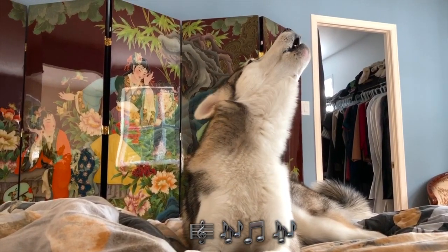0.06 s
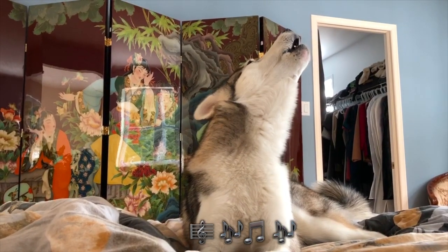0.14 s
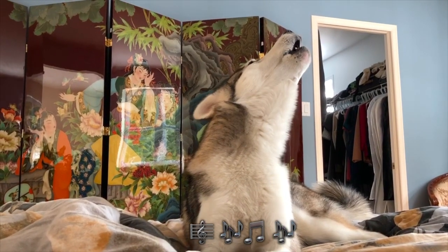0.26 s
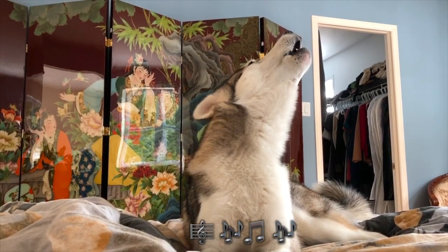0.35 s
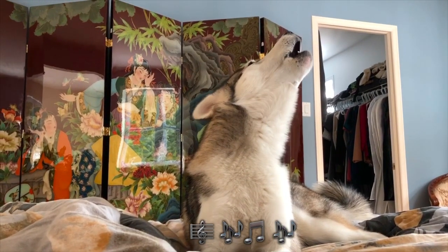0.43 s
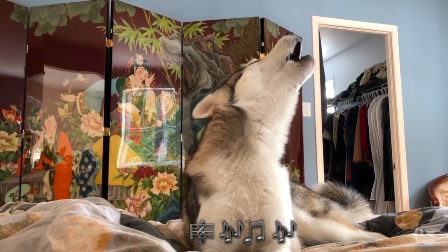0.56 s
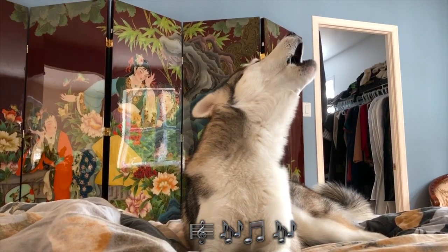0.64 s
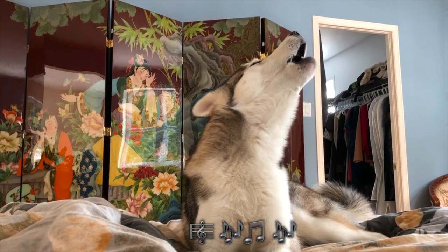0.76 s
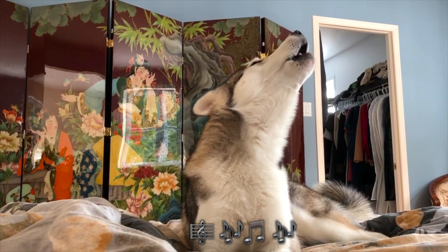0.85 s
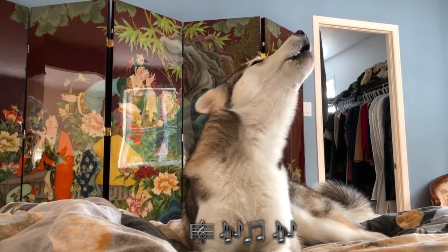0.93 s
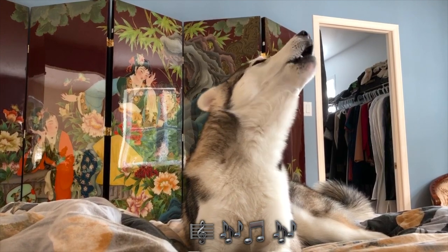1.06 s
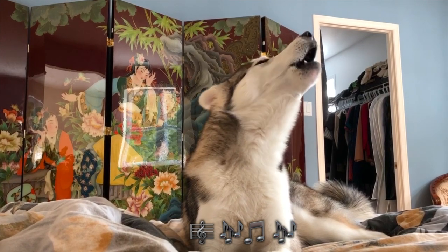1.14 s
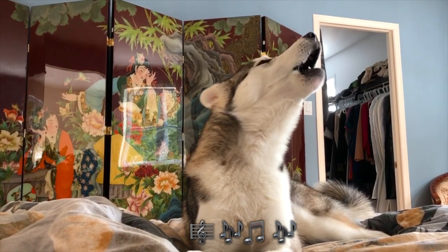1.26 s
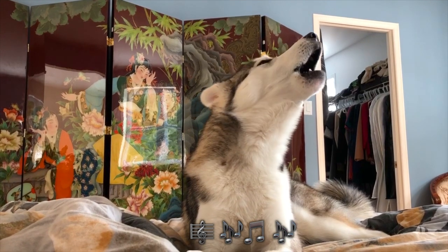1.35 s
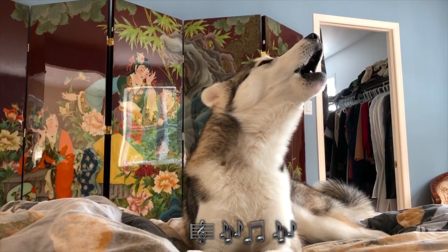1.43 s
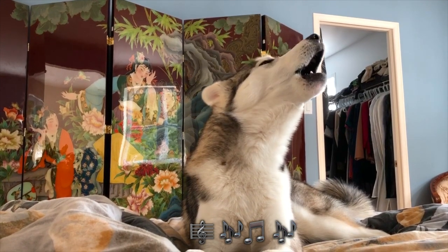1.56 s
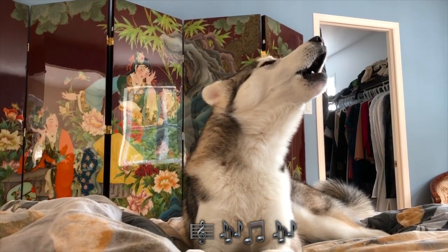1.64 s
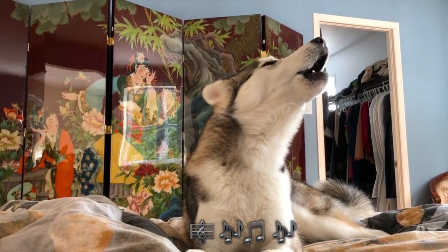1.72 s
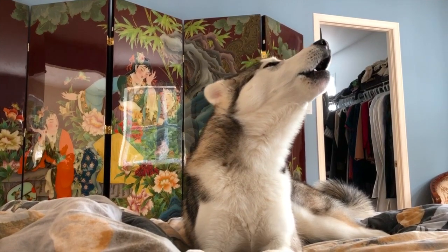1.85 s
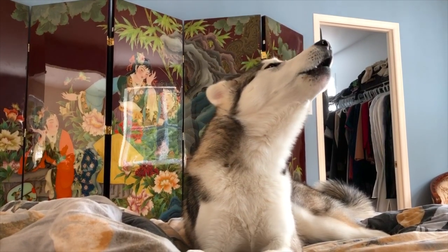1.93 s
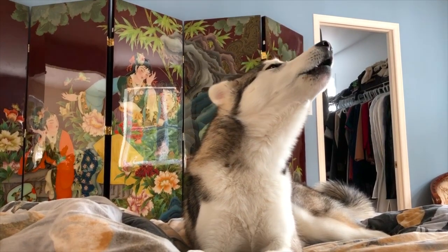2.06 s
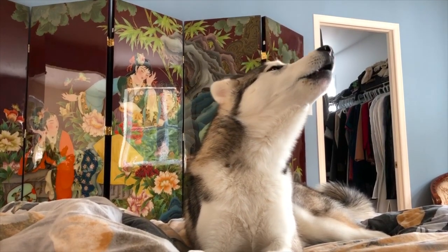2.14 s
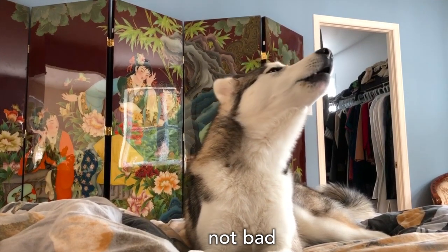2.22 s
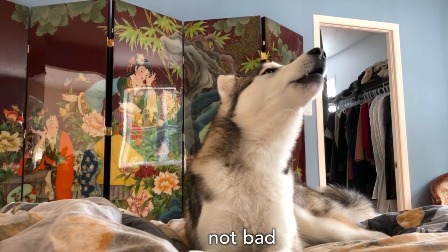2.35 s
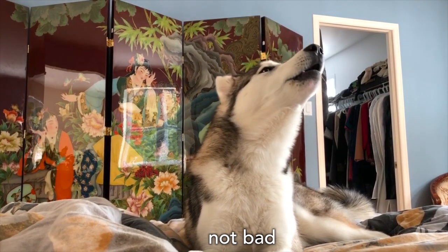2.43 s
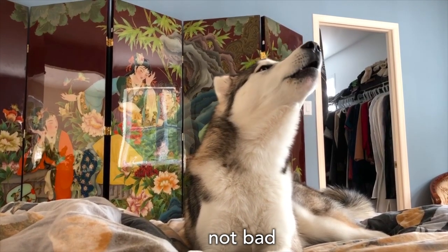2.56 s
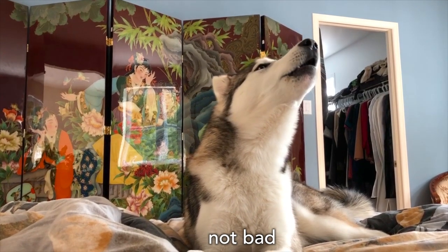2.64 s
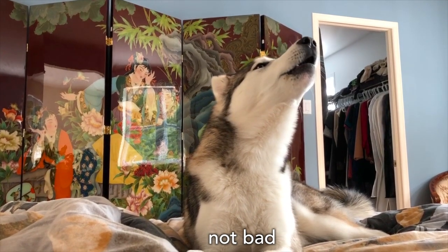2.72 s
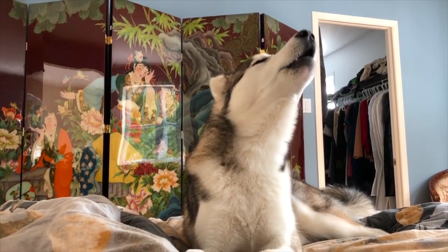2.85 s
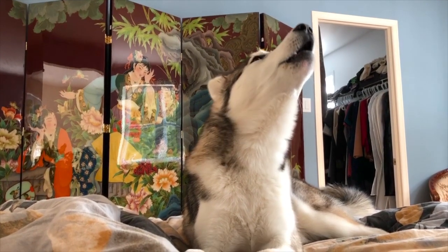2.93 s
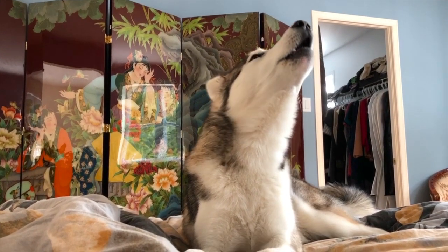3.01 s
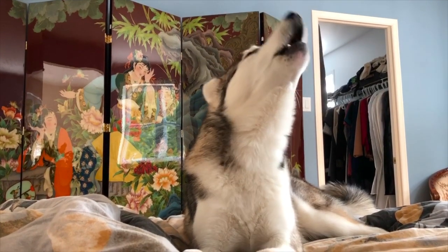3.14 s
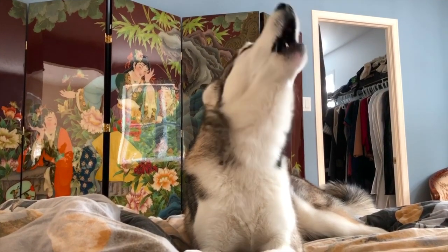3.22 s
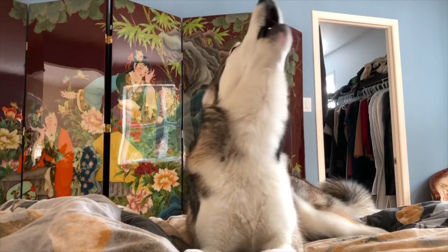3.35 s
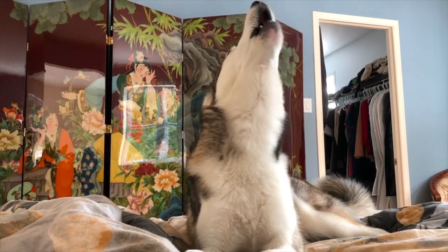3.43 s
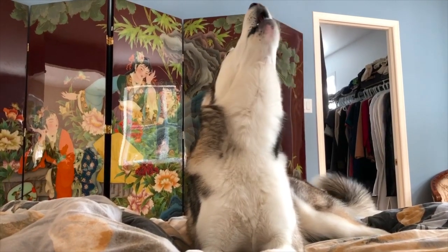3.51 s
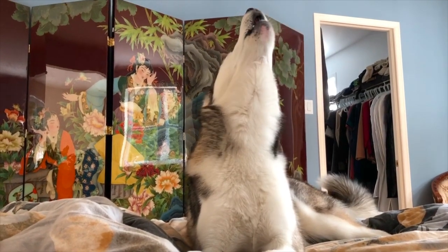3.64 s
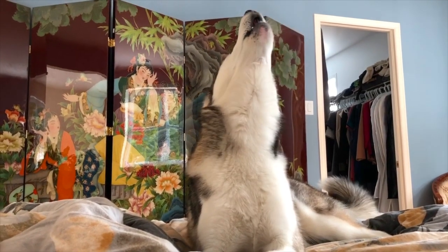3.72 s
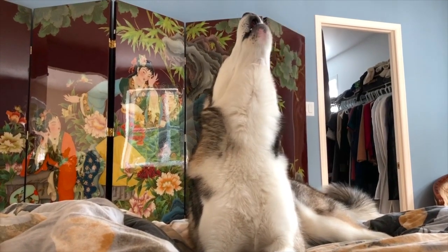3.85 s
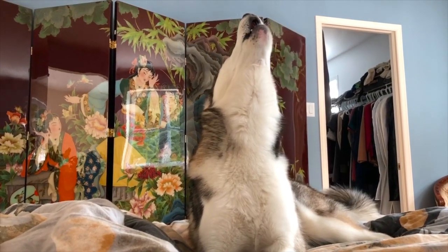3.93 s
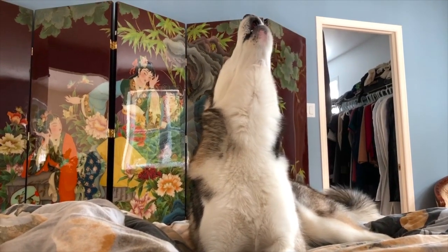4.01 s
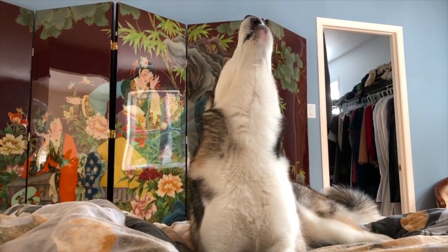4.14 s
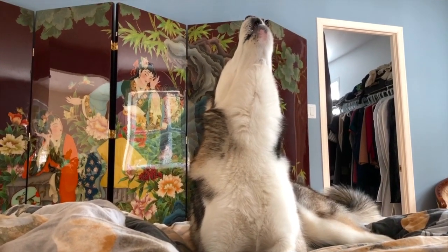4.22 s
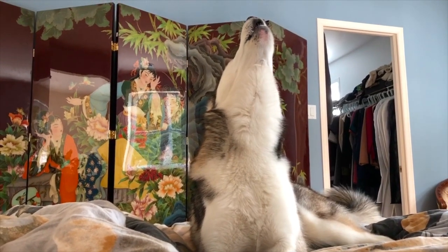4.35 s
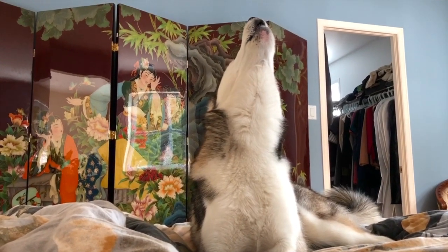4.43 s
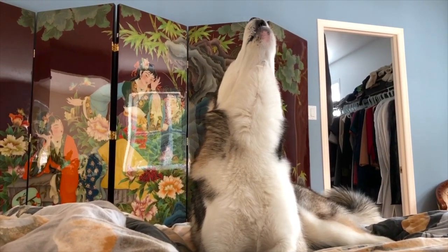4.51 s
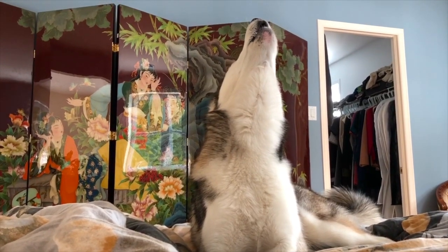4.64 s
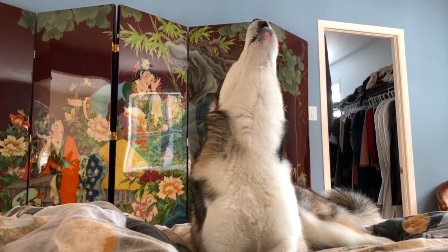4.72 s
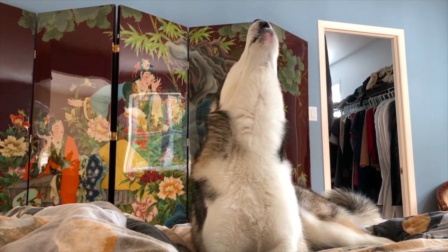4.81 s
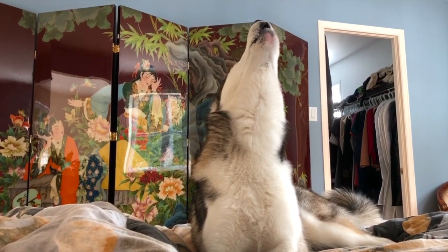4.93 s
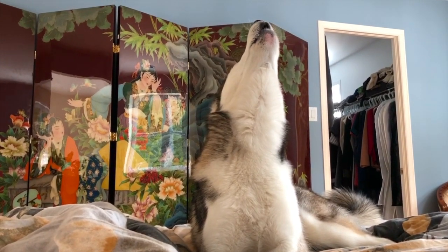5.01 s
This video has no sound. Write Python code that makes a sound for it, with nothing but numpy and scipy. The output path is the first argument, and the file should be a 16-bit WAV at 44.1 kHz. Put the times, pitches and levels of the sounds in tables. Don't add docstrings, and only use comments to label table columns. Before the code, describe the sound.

A husky close to a phone microphone in a small soft bedroom is already howling at the start: a nearly pure, hollow mid-pitched tone around 470 Hz with faint nasal ring and breath. It rises to about 520 Hz near 0.8 s, drops by 1.0, rises again by 1.4, then sinks and dies around 2.0. From 2.0 to 3.2 two distant dogs are exposed, one lower and stronger, one higher and fainter, their thin tones falling and fluttering. Low room rumble swells under faint hiss, with tiny collar or cloth ticks and soft mattress bumps around 2.1-2.9. At 3.2 a firmer thump meets a sudden open-mouthed yelp sweeping upward, rough and breathy. At 3.36 it cracks to about 700 Hz, eases down, then tips back near 4.25 to around 500 Hz. It keeps sinking, still sounding at 5 s, with distant howls rising behind from about 4.4. Short room echo throughout.

```python
import sys
import numpy as np
from scipy import signal
from scipy.fft import rfft, irfft, next_fast_len
from scipy.io import wavfile
from scipy.ndimage import uniform_filter1d, map_coordinates

SR = 44100
rng = np.random.default_rng(int(sys.argv[2]) if len(sys.argv) > 2 else 0)


def waveform_to_disk(signal):
    frames = np.transpose(np.atleast_2d(signal))
    scaled = np.clip(frames, -1, 1) * 32767
    samples = np.round(scaled).astype(np.int16)
    wavfile.write(sys.argv[1], SR, samples)


def to_linear_factor(level_db):
    exponent = np.asarray(level_db, float) / 20
    return 10 ** exponent


N = 223807
TIME = np.arange(N) / SR

# columns freq_hz, level_db
NOSE = [(3900, -51), (4500, -18), (5000, -12), (5400, 6), (5900, -15.5), (6500, 2.5), (7400, -13),
        (8200, -27), (9300, -33.5), (10400, -47.5), (11800, -39.5), (13000, -50.5), (14200, -46),
        (15800, -59)]
# columns freq_hz, level_db
WIDE = [(700, 4.5), (1300, -3.5), (1800, -19.5), (2200, -29.5), (2600, -36), (3100, -17), (3500, -28),
        (3900, -38), (9000, -120)]


def unit(x):
    return x / np.sqrt(np.mean(x ** 2) + 1e-20)


def along(points, hz):
    f, v = np.transpose(points)
    return np.interp(np.log(hz + 1), np.log(f + 1), v)


def curves(rows, fade):
    s, *cols = np.transpose(rows)
    opening = TIME - s[0] + fade * (s[0] < fade)
    closing = s[-1] + fade - TIME
    gate = np.clip(np.minimum(opening, closing) / fade, 0, 1)
    return [gate] + [np.interp(TIME, s, c) for c in cols]


def wobble(rate, count=1, on=slice(None)):
    knots = rng.standard_normal((count, int(N * rate / SR) + 4))
    return np.array([map_coordinates(k, [TIME[on] * rate], order=2) for k in knots])


def hiss(spectrum):
    m = next_fast_len(N + 8192)
    white = rfft(rng.standard_normal(m))
    colour = to_linear_factor(along(spectrum, np.fft.rfftfreq(m, 1 / SR)))
    return unit(irfft(white * colour, m)[:N])


def sags(rows, half_s):
    return to_linear_factor(-sum(db * np.exp(-((TIME - s) / half_s) ** 2) for s, db in rows))


def levelled(gain, waves):
    rms = np.sqrt((gain ** 2).sum(0)) + 1e-9
    return (gain * waves).sum(0) / uniform_filter1d(rms, size=2000)


def overtones(hz, flicker_db, rate, on, count):
    k = np.arange(1, count + 1)[:, None]
    turns = k * np.cumsum(hz[on]) / SR + rng.random((count, 1))
    waves = np.sqrt(2) * np.sin(2 * np.pi * turns)
    flicker = to_linear_factor(flicker_db * wobble(rate, count=count, on=on))
    return waves, flicker, k * hz[on]


def walls(hz):
    # columns freq_hz, depth_db, half_width_hz
    nulls = [(451.1, 14, 3.7), (510.9, 13.5, 2.6), (605, 7.5, 3), (668.8, 5, 7.6), (943, 9, 2.3),
             (965, 7, 2.1), (1009, 15.5, 4), (1301.4, 5, 4.7), (1371, 3, 14), (1388, 15.5, 3),
             (1516, 9, 24), (1900, 8.5, 8), (1957, 12, 2.7)]
    return to_linear_factor(-sum(db / (1 + ((hz - at) / half) ** 2) for at, db, half in nulls))


def echo(x, wet):
    # columns freq_hz, t60_s
    decay = [(200, 0.48), (1000, 0.59), (2000, 0.81), (4000, 0.89), (10000, 0.083)]
    hz, t, z = signal.stft(rng.standard_normal(SR // 2), SR, nperseg=256)
    fall = to_linear_factor(-60 * t / along(decay, hz)[:, None])
    energy = fall.shape[1] * np.mean(fall ** 2, 1, keepdims=True) * 128
    fall = fall * to_linear_factor(along(wet, hz))[:, None] / np.sqrt(energy)
    answer = signal.istft(z * fall, SR, nperseg=256)[1]
    return signal.fftconvolve(np.pad(x, (400, 0)), answer)[:N]


def quiet_room():
    # columns start_s, rumble_db, hum_db
    gain = [
        (0, -13.5, -77.5),
        (1.95, -12, -82.5),
        (2.3, -8, -81),
        (2.6, 2.5, -92),
        (3.2, 8, -68),
        (3.45, 12, -85),
        (3.55, -17, -97),
        (5.07, -8.5, -89),
    ]
    # columns freq_hz, level_db_per_hz
    rumble_colour = [(15, -22), (40, -10), (120, -4.5), (300, -6.5), (600, -24.5), (900, -56.5)]
    # columns freq_hz, level_db_per_hz
    hiss_colour = [(200, -20), (500, 1.5), (1300, -14.5), (1700, -14.5), (2600, -20.5), (3200, -10.5),
                   (4000, -19.5), (5500, -16.5), (8000, -21), (11000, -29.5), (15500, -42)]
    _, gain_db, hum_db = curves(gain, fade=.01)
    hum = to_linear_factor(hum_db + 1.6 * wobble(5.4)[0]) * np.sin(2 * np.pi * 120 * TIME)
    rumble = to_linear_factor(-72.0 + gain_db + 3.3 * np.tanh(wobble(9)[0])) * hiss(rumble_colour)
    return rumble + to_linear_factor(-66.5 + 0.18 * gain_db) * hiss(hiss_colour) + hum


def bed():
    # columns start_s, peak_db, pitch_hz
    thumps = [
        (2.471, -41.5, 152),
        (2.841, -45, 108.9),
        (2.87, -46, 130),
        (3.213, -23.5, 166),
        (3.342, -32, 110),
    ]
    # columns start_s, peak_db
    tick_times = [(2.1111, -59), (2.1586, -69), (2.345, -69), (2.466, -59), (2.8338, -53), (2.863, -46.5),
                  (2.8814, -53)]
    out, t = np.zeros(N + SR), np.arange(SR // 8) / SR
    for s, db, hz in thumps:
        swell = to_linear_factor(db - 60 * t / 0.046) * (1 - np.exp(-t / 0.0014))
        out[round(s * SR):][:len(t)] += swell * np.sin(2 * np.pi * hz * t * (1 - 4.4 * t))
    rustle = hiss([(1500, -3), (3500, 3.5), (8000, 5), (12000, -18), (16000, -41)])
    ticks = sum(to_linear_factor(db - 12) * np.exp(-((TIME - s - .004) / 0.0086) ** 2) for s, db in tick_times)
    return out[:N] + ticks * rustle


def far_dog(rows, voice, waver):
    gate, hz, db = curves(rows, fade=.07)
    on = gate > 0
    waves, flicker, at = overtones(hz * (1 + waver * wobble(35)[0]), 5.95, 22, on, count=13)
    flicker[0] = 1
    out = np.zeros(N)
    out[on] = (flicker * to_linear_factor(along(voice, at)) * waves).sum(0)
    return gate * to_linear_factor(db) * out


def far_pack():
    # columns start_s, pitch_hz, level_db
    low = [(2.06, 485, -42), (2.12, 481, -50), (2.22, 465, -42), (2.44, 474, -45.5), (2.48, 448.4, -39.5),
           (2.8, 436, -44), (2.94, 440.5, -40.5), (3.1, 414.5, -45.5), (3.17, 412.6, -53)]
    low_late = [(4.36, 393.4, -63.5), (4.48, 429, -42), (4.6, 442, -42), (4.75, 456, -42.5),
                (4.9, 510, -47)]
    high = [(1.35, 539, -63), (1.8, 522, -50.5), (2.1, 510, -54.5), (2.42, 485.5, -56.5), (2.8, 464, -67)]
    high_end = [(4.7, 457.4, -60.5), (4.8, 486, -49), (4.88, 513.5, -49), (5.07, 511, -48.5)]
    # columns freq_hz, level_db
    low_voice = [(440, 4), (880, -19), (1320, -32.5), (1760, -49.5), (2200, -25), (2640, -56), (3090, -30),
                 (3520, -64.5), (5400, -51.5), (7000, -59)]
    high_voice = [(500, 0.5), (1000, -8), (1500, -30.5), (2500, -48.5), (3100, -19.5), (4000, -51)]
    # columns start_s, depth_db
    falters = [(2.345, 10), (2.405, 13), (2.435, 8), (2.548, 12), (2.661, 29), (2.769, 15), (2.898, 27),
               (3.05, 15)]
    pack = sags(falters, half_s=0.0091) * far_dog(low, low_voice, .006)
    pack = pack + far_dog(low_late, low_voice, .005)
    pack = pack + far_dog(high, high_voice, .009) + far_dog(high_end, high_voice, .005)
    return pack + echo(pack, [(500, -5), (3000, -1)])


def catches():
    # columns start_s, puff_db
    puff_times = [(3.205, -30.5), (3.226, -19.5), (3.295, -37), (3.337, -40.5), (3.361, -43)]
    puffs = sum(to_linear_factor(db) * np.exp(-((TIME - s) / 0.0042) ** 2) for s, db in puff_times)
    throat = hiss([(60, -37), (250, 12.5)] + WIDE)
    sizzle = hiss([(6000, -40.5), (8000, -0.5), (12000, -11.5), (15500, -18.5)])
    return puffs * (throat + to_linear_factor(-12.5) * hiss(NOSE) + to_linear_factor(-31) * sizzle)


def released(rows):
    release_s, sag_hz, die_db, nose_shuts_db = 0.1, 81.2, 27.5, 13
    s, hz, db, pressing_db = rows[-1]
    halfway = (s + .5 * release_s, hz - .8 * sag_hz, db - 0.51 * die_db, pressing_db)
    end = (s + release_s, hz - sag_hz, db - die_db, pressing_db - nose_shuts_db)
    return rows + [halfway, end]


def howl(rows, tract, breath_db, side_db, fade, open_db, inertia, stretch=0):
    # columns freq_hz, level_over_effort_db
    octave_gain = [(600, -8.5), (850, -11.5), (920, -18), (965, -23), (1030, -20), (1200, -9.5),
                   (1270, 1.5), (1400, 10.5)]
    # columns third_overtone_hz, level_over_effort_db
    third_gain = [(900, -21), (1270, -12), (1350, -12), (1500, -21), (1830, -28), (1950, -19),
                  (2100, -19.5)]
    # columns start_s, depth_db
    falters = [(.053, 3.5), (.189, 7.5), (.282, 8.5), (.357, 7.5), (.409, 7.5), (.451, 8), (.487, 6),
               (.564, 4.5), (.62, 10), (.728, 9), (.775, 6.5), (.795, 1), (.86, 7), (.92, 11.5),
               (1.342, 6.5), (1.463, 4.5), (1.53, 7), (3.335, 4.5), (3.42, 5), (4.17, 2), (4.19, 8),
               (4.225, 9), (4.254, 3.5), (4.343, -3.5), (4.373, 6.5), (4.418, 7.5), (4.565, 9),
               (4.578, 4.5)]
    gate, hz, effort_db, pressing_db = curves(rows, fade)
    hz, on = uniform_filter1d(hz, size=inertia), gate > 0
    octave_db = effort_db + open_db + along(octave_gain, 2 * hz)
    mouth_db = effort_db + open_db + along(third_gain, 3 * hz)
    ring_db = effort_db + pressing_db

    slide = np.clip(uniform_filter1d(np.abs(np.gradient(hz)) * SR / hz, size=1500), 0, 3)
    drift = (.001 + .0015 * slide) * wobble(60)[0]
    roughness = (.0006 + .001 * (hz > 600) + .006 * np.minimum(slide, 1.5)) * wobble(250)[0]
    waves, flicker, at = overtones(hz * (1 + drift + roughness), 5, 11, on, count=32)
    flicker[:2] = 0
    room = walls(np.arange(1, 4)[:, None] * hz[on])
    mouth = np.sqrt(flicker) * to_linear_factor(along(tract, at)) * np.clip((2500 - at) / 450, 0, 1)
    throat = flicker * to_linear_factor(along(tract, at)) * np.clip((at - 2200) / 300, 0, 1)
    nose_stretch = 1 + stretch * np.clip((hz[on] - 470) / 45, 0, 1)
    ring = flicker ** 1.04 * to_linear_factor(along(NOSE, at / nose_stretch))

    side = to_linear_factor(side_db - 5 + 3.3 * wobble(8.3, on=on)[0]) * np.clip((560 - hz[on]) / 60, 0, 1)
    side = side * np.sin(2 * np.pi * np.cumsum(.36 * hz[on]) / SR)
    fuzz = to_linear_factor(side_db + 7 + 8 * np.tanh(2 * wobble(13, on=on)[0])) * wobble(150, on=on)[0]
    chest = to_linear_factor(effort_db) * sags(falters, half_s=0.0049)
    out = np.zeros(N)
    out[on] = chest[on] * (room[0] + side + fuzz) * waves[0]
    out[on] += to_linear_factor(octave_db[on]) * room[1] * waves[1]
    out[on] += to_linear_factor(mouth_db[on]) * room[2] * levelled(mouth, waves)
    ring_and_throat = levelled(ring, waves) + to_linear_factor(-17.5) * levelled(throat, waves)
    out[on] += to_linear_factor(ring_db[on] + 1.6 * wobble(24, on=on)[0]) * ring_and_throat

    loud = np.hypot(to_linear_factor(octave_db), to_linear_factor(mouth_db))
    breath = loud * hiss([(350, -90), (520, -12)] + tract[1:]) + to_linear_factor(ring_db + 8) * hiss(NOSE)
    sizzle = hiss([(6000, -61.5), (7800, -1.5), (10000, -8), (12000, -13), (15500, -29)])
    breath += to_linear_factor(ring_db - 3.0) * np.clip(hz / 700, 0, 1) ** 3 * sizzle
    return gate * (out + to_linear_factor(breath_db + 1.1 * slide + 0.74 * wobble(25)[0]) * breath)


def husky():
    # columns start_s, pitch_hz, effort_db, nasal_pressing_db
    first = [
        (0, 472, -25, -22.5),
        (.47, 479.2, -23, -21),
        (.6, 502.9, -17.5, -20),
        (.79, 520.6, -15.5, -21.5),
        (1.04, 435.5, -20.5, -25),
        (1.36, 478.8, -19.5, -16.5),
        (1.57, 477.2, -20, -24),
        (1.71, 441.6, -25, -20.5),
        (1.9, 422.1, -23, -23),
    ]
    yelp = [
        (3.202, 298, -53.5, 8),
        (3.209, 329.4, -28.5, -14),
        (3.232, 427.2, -13, -13),
        (3.272, 488.7, -12.5, -23),
        (3.302, 512, -11, -11),
        (3.33, 534.6, -17.5, -19),
        (3.362, 570, -14, -13.5),
    ]
    second = [
        (3.358, 699.8, -22, -10),
        (3.62, 672.1, -23.5, -9.5),
        (4.05, 639.6, -24.5, -13),
        (4.2, 590.8, -20, -18.5),
        (4.265, 501.3, -20, -17),
        (4.55, 473.2, -22, -22),
        (4.85, 458.5, -19.5, -19.5),
        (4.95, 442.8, -22, -14),
        (5.07, 437.6, -19, -18),
    ]
    # columns freq_hz, level_db
    throat = [(410, -56), (700, -7.5), (1020, -13), (1300, -4.5), (1370, -7), (1590, -18.5), (1940, -25.5),
              (2270, -28.5), (2640, -44), (3500, -20.5), (4300, -53.5), (5590, -67), (9460, -120)]
    # columns freq_hz, level_db
    wet = [(500, -12), (900, -11), (1500, -9.5), (2500, -7.5), (10000, -6.5)]
    voice = howl(released(first), throat, -33, -37, .008, open_db=0, inertia=2000)
    voice = voice + howl(second, throat, -33, -40, .008, open_db=0, inertia=1100)
    voice = voice + howl(yelp, WIDE, -16.5, -39, 0.0033, open_db=4.5, inertia=200, stretch=0.1)
    voice = voice + catches()
    settled = np.minimum(TIME / .06, 1)
    return voice + echo(settled * voice, wet)


def scene():
    return (quiet_room() + bed() + far_pack() + husky())[None]


def top_cut(x):
    return signal.sosfilt(signal.butter(12, 15720, fs=SR, output="sos"), x)


def record(dry):
    return top_cut(dry)


dry = scene()
out = record(dry)
waveform_to_disk(out)
```